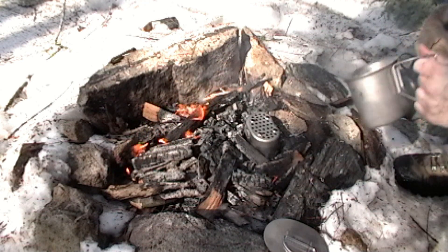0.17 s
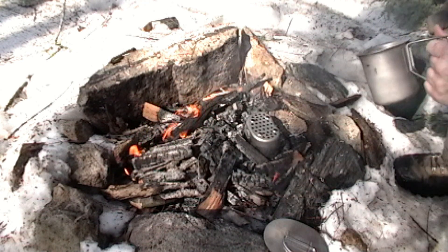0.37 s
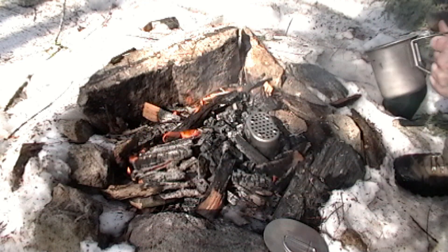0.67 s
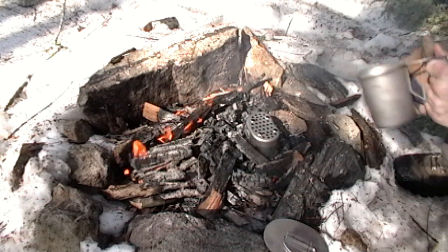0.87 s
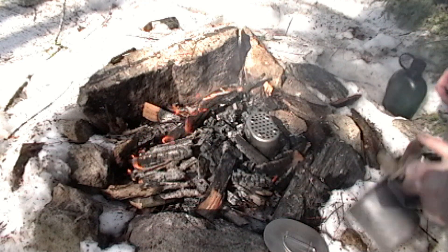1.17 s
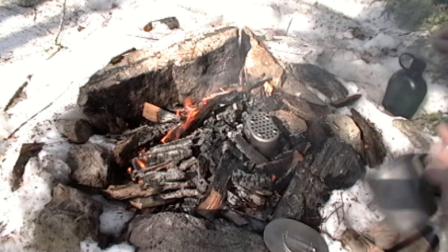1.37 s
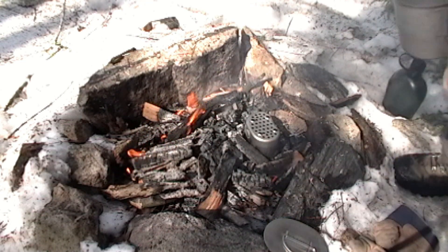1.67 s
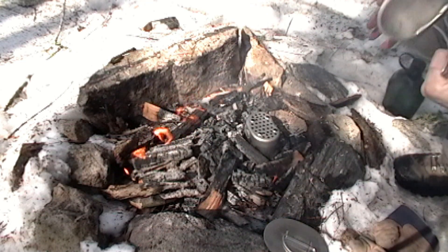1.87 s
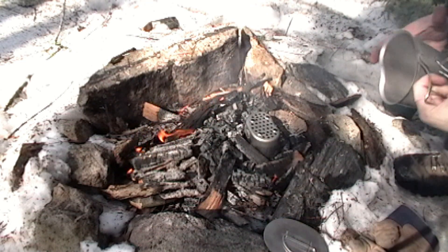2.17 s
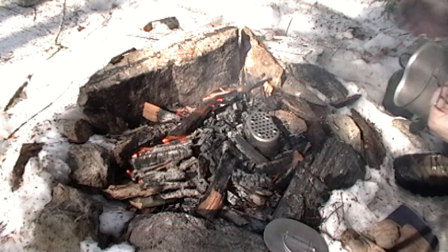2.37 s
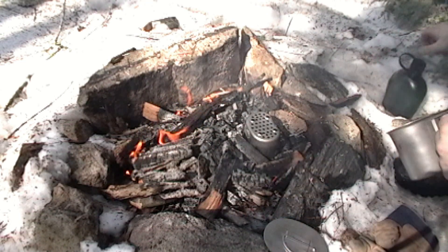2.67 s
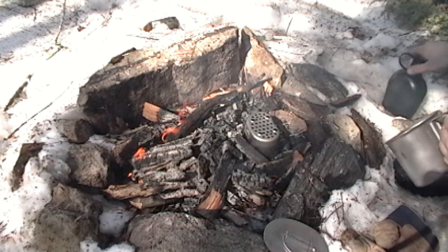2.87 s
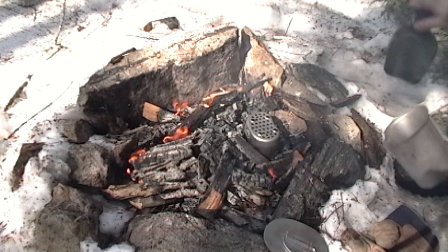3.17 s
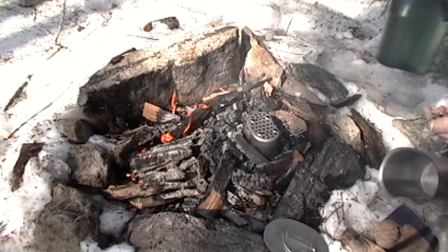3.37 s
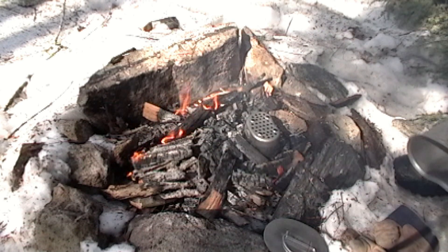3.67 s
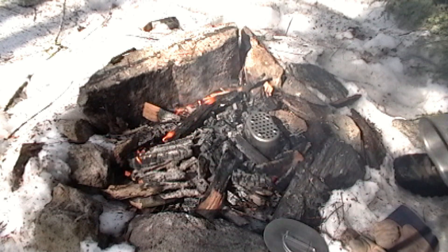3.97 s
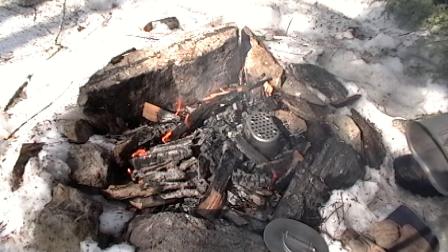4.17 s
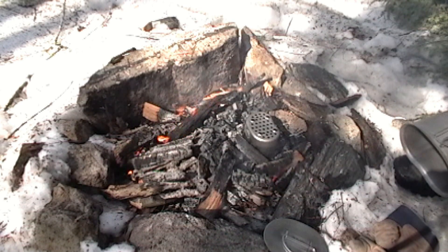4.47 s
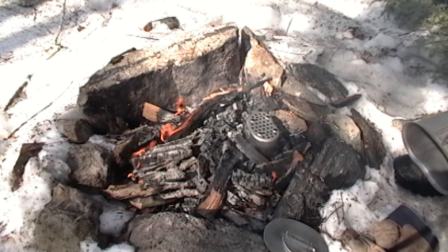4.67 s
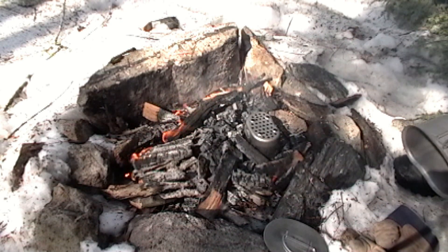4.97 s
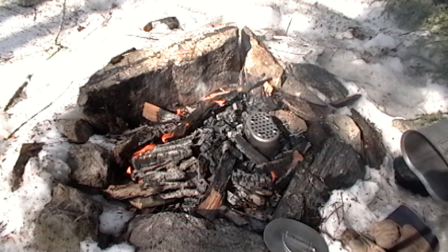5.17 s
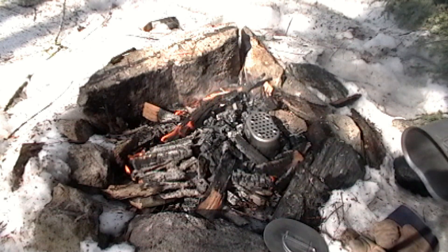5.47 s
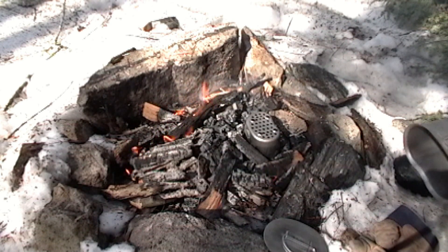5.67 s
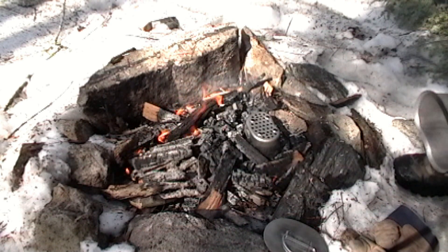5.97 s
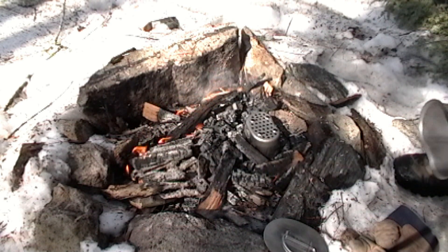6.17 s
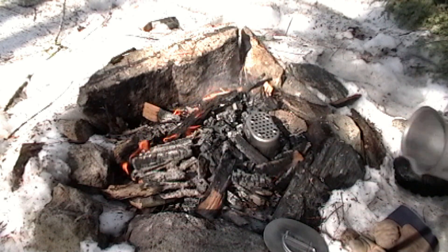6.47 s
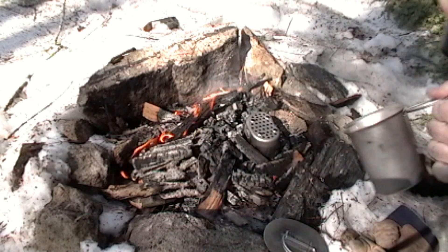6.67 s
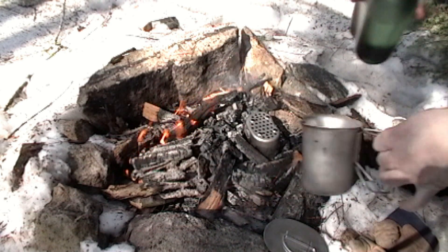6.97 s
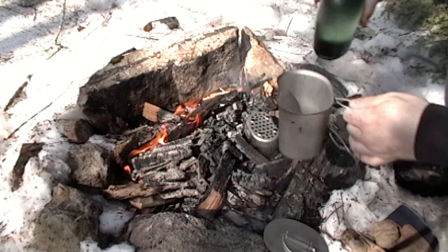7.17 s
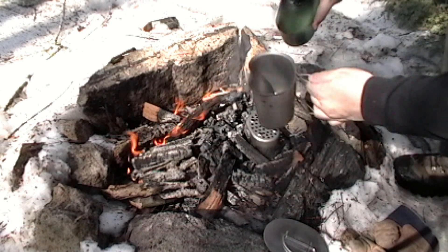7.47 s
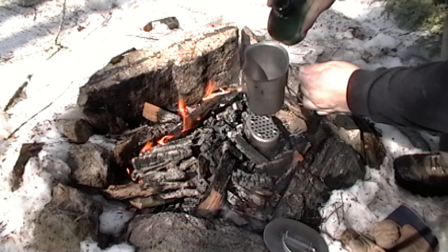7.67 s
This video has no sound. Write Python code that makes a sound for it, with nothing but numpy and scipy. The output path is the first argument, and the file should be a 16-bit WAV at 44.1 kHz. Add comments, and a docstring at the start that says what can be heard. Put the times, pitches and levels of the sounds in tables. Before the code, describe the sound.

Close by and a little to the right, a thin steel mug and cup rattle and knock together with short rings, one sharp clank standing out. After they settle, a plastic bottle cap turns in dry snaps, the neck pops, and water gives a few faint glugs. Sleeves rustle lightly. A small campfire murmurs and crackles softly throughout, outdoors with only a slight echo.

```python
"""Steel clanks close by, right of the microphone: a mug and a canteen cup are pulled apart, knocked
together and set down, their thin walls rattling and ringing. Then the plastic cap of a water bottle
sticks and slips on its thread, the neck pops, and pockets of air ring as the water gives a first glug.
Sleeves rustle. Nearer the middle, a small campfire in the snow murmurs throughout and crackles as
pockets in the wood burst. The woods return a faint tail of the gear."""
import sys
import numpy as np
from scipy import signal
from scipy.fft import rfft, irfft
from scipy.io import wavfile
from scipy.ndimage import uniform_filter1d

SR = 44100
rng = np.random.default_rng(int(sys.argv[2]) if len(sys.argv) > 2 else 0)


def transcribe(signal):
    """Save signal, clipped to [-1, 1], as a 16-bit WAV file at the path in sys.argv[1]."""
    frames = np.atleast_2d(signal).T
    limited = np.clip(frames, -1, 1)
    pcm = np.round(limited * 32767).astype(np.int16)
    wavfile.write(sys.argv[1], SR, pcm)


N = 345539

# The bed of fire and open air. Each row: frequency in Hz, relative level in dB per Hz.
AIR_COLOUR = [(15, -26), (25, -27), (82, 1.5), (149, 2), (416, -5.5), (489, -16), (591, -5.5), (911, -6),
              (1160, -12), (1520, -8.5), (2610, -17.5), (7920, -27), (9570, -23), (14800, -29.5),
              (16000, -46)]
# Sharp cracks of the firewood. Each row: start in seconds, relative level in dB, pitch in Hz.
WOOD_CRACKS = [(.7235, -35.5, 4200), (.7986, -35.5, 11100), (.816, -39, 2440), (1.1243, -43, 6800),
               (1.734, -35, 5200), (2.8557, -38, 11450), (3.5583, -29, 10200), (3.566, -29.5, 11500),
               (3.704, -28.5, 9400), (3.8608, -40.5, 2410), (4.221, -28.5, 11000), (4.7317, -42, 9540),
               (4.9663, -30.5, 10500), (5.3603, -36.5, 11340), (5.5352, -30.5, 7000), (5.7154, -35.5, 6500),
               (5.7827, -39.5, 3870), (6.2248, -33.5, 3760), (6.3096, -39.5, 3870), (6.3344, -33.5, 3800),
               (6.3814, -42, 3610), (6.4838, -40, 8910), (6.5861, -30, 3870), (6.6728, -41.5, 2750),
               (6.9155, -46, 5070), (7.2992, -41.5, 5960), (7.364, -34, 12900), (7.8073, -40, 4350)]
# Cloth and fingers on the gear. Each row: middle in seconds, half length in seconds, relative level in dB.
CLOTH_STROKES = [(.4, 0.2, -53), (.98, 0.24, -50.5), (2.72, 0.026, -59), (3.2, .13, -61.5),
                 (4.12, 0.13, -61.5), (6.3, 1.3, -62.5), (6.8, .07, -55), (7.02, .12, -57),
                 (7.32, 0.029, -53.5)]
# The tone of that rustle. Each row: frequency in Hz, relative level in dB per Hz.
CLOTH_COLOUR = [(1000, -17.5), (2500, -4), (3000, -11.5), (3300, -3), (3800, -2), (5000, -10), (6100, -3),
                (8000, -10), (12000, -11), (16000, -16.5)]
# Dull knocks of the gear, and a low thump as the hardest clank overloads the recorder.
# Each row: start in seconds, level in dB, pitch in Hz.
DULL_THUMPS = [(0.367, -45, 220), (1.31, -40, 232.4), (1.309, -54, 75), (1.314, -17.5, 1070),
               (1.944, -35, 345), (2.103, -40.5, 308), (2.152, -43, 312), (2.57, -41, 200),
               (2.717, -42, 200), (3.289, -43, 110), (3.798, -41.5, 240), (4.13, -44.5, 53.7),
               (6.168, -40.5, 231)]
# Air pockets in the slopping water. Each row: start in seconds, level in dB, starting pitch in Hz.
WATER_BUBBLES = [(3.827, -38, 1850), (3.828, -39, 757), (5.577, -34.5, 1700), (5.672, -26, 740),
                 (6.260, -34.5, 843), (6.553, -35, 820), (7.673, -36, 844), (7.688, -35.5, 294),
                 (7.725, -37.5, 362)]
# The neck popping open. Each row: starting pitch in Hz, level in dB.
POP_TONES = [(573, -16.5), (1570, -16)]
# The cap grinding round. Each row: middle in seconds, half length in seconds, level in dB.
CAP_TURNS = [(4.555, 0.034, -35.5), (4.905, 0.039, -44.5), (5.19, 0.054, -45.5)]
# The cap snapping on its thread. Each row: start in seconds, level in dB, treble in dB,
# grinding time in seconds.
CAP_SNAPS = [(4.118, -34, -11, 0.0013), (4.242, -34, -5, .002), (4.447, -21.5, 0, 0.0017),
             (4.467, -27, -10, .003), (4.538, -29, 4, 0.0035), (4.55, -27, 10, 0.0082),
             (4.592, -37.5, -7, 0.0071), (4.825, -38, -25, .006), (4.842, -33, -14, .003),
             (5.132, -39, -2, 0.0074), (5.137, -27.5, -7, 0.0052), (5.223, -22, 0, .006),
             (5.257, -39.5, -15, 0.011), (5.656, -25.5, 10, 0.0028), (5.667, -26.5, -26, 0.00073)]
# The tone of the cap. Each row: frequency in Hz, relative level in dB per Hz.
PLASTIC_COLOUR = [(88, -26), (150, -5), (240, 0.5), (280, -1.5), (391, -4), (484, -11.5), (524, -5),
                  (730, 2.5), (941, 0), (1080, -6), (1760, 2.5), (3100, -1.5), (4410, -1.5), (11300, -12.5),
                  (16000, -20)]
# The crowd of short modes in the steel walls. Each row: frequency in Hz, relative level in dB per Hz.
WALL_COLOUR = [(500, -31.5), (700, -5), (1050, -18.5), (1250, -10), (1500, -11.5), (2300, -10), (2900, -5),
               (4400, -0.5), (6500, -2.5), (9000, -5), (13000, -9), (16000, -19.5)]
# Clear modes of mug and cup. Each row: frequency in Hz, relative level in dB, nominal t60 in seconds.
MUG_MODES = [(1502, -25, .5), (1975, -7.5, .36), (2360, -14, .3), (2963, 2.5, .2), (3036, -6, .26),
             (3372, -7, .17), (3790, -4, .13), (3950, -4, .19), (4364, -1, .2), (4716, -4, .2),
             (4845, -5, .17), (5367, -1, .17), (5899, -1, .17), (7115, -6, .13), (8680, -11, .11)]
CUP_MODES = [(725, -2, .08), (757, 1.5, .1), (924, -5, .36), (1275, -2, .09), (1720, -4, .11),
             (2180, -1, .2), (2690, 1, .07), (2762, 3, .12), (3854, -1, .14), (4290, 0, .13),
             (4791, 0, .18), (5205, -5, .13), (5716, -3, .1), (6031, 0, .14), (7092, 0, .12),
             (7305, -5, .1), (8312, -5, .12)]
# The mug's lasting tones. Each row: frequency in Hz, relative level in dB, t60 in seconds.
FREE_MUG_MODES = [(1502, -2.5, 1.2), (1975, 7, .3), (2358, 2, .45), (3372, 4, .28), (4712, -3, .42)]
# Steel on steel. Each row: start in seconds, relative level in dB, bass in dB, chatter time in seconds,
# balance of mug over cup in dB, pitch favoured by the point struck in Hz.
STEEL_CLANKS = [(.001, -18.5, 0, 0.016, -1.5, 4300), (.018, -23.5, 3, 0.02, 12, 3000),
                (.076, -18.5, 0.5, 0.0099, 7, 4300), (.089, -21, 1, 0.016, 18, 2960),
                (.130, -27, 2, .007, 13, 2960), (.168, -37.5, 0, 0.027, -6, 2960),
                (.288, -28.5, 5.5, 0.021, 1, 4300), (.362, -33, 2, 0.0063, 6.5, 4300),
                (.906, -29.5, -1.5, 0.0054, -3, 3100), (.934, -26.5, 2, 0.0048, 5, 3200),
                (1.017, -20.5, 0.5, 0.013, 12, 4500), (1.039, -24.5, 7.5, 0.015, -4.5, 4300),
                (1.142, -30.5, 12.5, 0.02, 5, 1270), (1.183, -28.5, 14, 0.02, 14.5, 3900),
                (1.262, -18, -3.5, .027, -7.5, 750), (1.298, -22.5, 2, 0.0063, -13.5, 7040),
                (1.311, -3.5, -11, 0.0029, -10.5, 924), (1.324, -19.5, 4, .05, 6.5, 2000),
                (1.377, -8.5, -10.5, 0.0068, -4, 4660), (1.401, -14, -9.5, .016, -0.5, 3400),
                (1.757, -21.5, 4, 0.028, -2.5, 757), (1.849, -16, 3, 0.025, -22, 2750),
                (1.887, -21, 1, 0.024, -9, 4300), (1.922, -14, -7.5, 0.011, 6, 6000),
                (1.939, -12, 2.5, 0.018, -14.5, 3800), (2.066, -16.5, -10, 0.017, -2, 7300),
                (2.103, -13.5, 5.5, 0.0069, -7, 4790), (2.150, -19, 6, 0.018, 4.5, 8300),
                (2.186, -25.5, 2.5, 0.0063, -2, 4790), (2.241, -41, 13.5, 0.035, 15, 900),
                (2.31, -23, 6, 0.00304, -4.5, 3000), (2.39, -27.5, 10.5, 0.0041, 3, 6000),
                (2.476, -36, 15.5, 0.0043, -2.5, 3800), (2.715, -53.5, 10.5, 0.036, -13, 924),
                (2.775, -30.5, 4, 0.00084, -2, 11000), (2.974, -50, 2.5, 0.0074, -6.5, 4790),
                (3.227, -39.5, -16.5, 0.0023, 0, 9000), (3.703, -41.5, 13.5, 0.0066, -15.5, 800)]
# Stereo width at the microphone. Each row: frequency in Hz, side minus mid in dB.
STEREO_WIDTH = [(30, -5), (120, -24), (600, -15), (2000, -13), (4000, -11.5), (8000, -17.5), (13000, -4.5)]
# The casing shades the left microphone port from sounds on the right.
# Each row: frequency in Hz, left minus right in dB per unit of offset.
CASING_SHADE = [(300, -.7), (1200, -1.2), (2500, -2.9), (4500, -2.4), (8000, 0), (13000, .5)]

SPITS_PER_S, SPIT_DB, SPIT_RANGE_DB = 14, -57, 12   # tiny cracks: most are faint, a few stand out
SPIT_LOW_HZ, SPIT_HIGH_HZ = 2980, 12500
FLURRY_S, FLURRY_HALF_S, FLURRY_PER_S = 7.8, 0.63, 77   # for a while the fire spits more busily
BUBBLE_CYCLES, SWELL_CYCLES, RISE_OCTAVES_PER_S = 52, 1.14, 2.1
CAVITY_HZ, CAVITY_DB, CAVITY_T60_S = 315, -3, 0.034   # the air in the closed bottle
POP_S, POP_T60_S = 5.6565, .049
CHATTER_S = 0.012   # a typical steel contact
TREBLE_DB, TREBLE_DB_PER_DOUBLING = -1, -1.1   # the briefer the contact, the brighter
RING_DB, RING_DB_PER_DOUBLING = -7.5, 4   # the longer it chatters, the more ring builds up
FIRM_DB, GRIP_DAMPING = -23, 0.11   # firm blows press the vessels together: dB of ring lost per dB
MUG_SUSTAIN, CUP_SUSTAIN = 1.05, 1.104   # factors on the nominal t60
LOW_RING_DB = 3   # the rims' slow flexing modes take more of each blow
FAVOUR_DB, WALL_FAVOUR_DB = 8.5, 2.5   # lift for modes near the favoured pitch
GRAZE_DB, GRAZE_LEAD = -17, .5   # the rims graze before they catch; lead as a share of the chatter
FREED_S, FREED_DB, FREED_SWELL_S = 1.379, -35, .016   # the mug comes free


def from_db(db):
    """Decibels to gain."""
    return 10 ** (np.asarray(db) / 20)


def rms_one(x):
    """Scale to rms 1."""
    return x / np.sqrt(np.mean(x ** 2) + 1e-20)


def burst_one(x):
    """Scale so that the loudest 4 ms have rms 1."""
    return x / np.sqrt(uniform_filter1d(x ** 2, size=176).max() + 1e-20)


def at_hz(points, hz):
    """Read a spectrum on a log-frequency axis."""
    f, db = np.transpose(points)
    return np.interp(np.log(np.maximum(hz, 1)), np.log(f), db)


def coloured(x, points, size=4096):
    """Causal, minimum-phase filter through the given (Hz, dB) points."""
    gain = from_db(at_hz(points, np.arange(size // 2 + 1) * SR / size))
    cepstrum = irfft(np.log(gain))
    cepstrum[1:size // 2] *= 2
    cepstrum[size // 2 + 1:] = 0
    return signal.fftconvolve(x, irfft(np.exp(rfft(cepstrum))))[:len(x)]


def add(out, s, sound):
    """Mix a sound in at s seconds."""
    at = int(np.clip(round(s * SR), 0, N - 1))
    out[at:at + len(sound)] += sound[:N - at]


def fade(t, t60):
    """Fall by 60 dB in t60."""
    return np.exp(-np.log(1000) * t / t60)


def swell_and_ebb(middle, half):
    """A smooth rise to 1 and fall again around a moment."""
    return np.exp(-np.minimum(((np.arange(N) / SR - middle) / half) ** 2, 50))


def resonance(x, hz, q):
    """One resonance, narrower as q rises."""
    radius = np.exp(-np.pi * hz / q / SR)
    angle = 2 * np.pi * min(hz, SR / 2) / SR
    return signal.lfilter([1, 0, -1], [1, -2 * radius * np.cos(angle), radius * radius], x)


def woods(x, wet_db=-29, t60=.8):
    """From further off, trunks and rocks scatter a faint, dull tail back to the microphone."""
    t = np.arange(SR) / SR
    colour = [(300, 2.5), (1000, -5), (4500, -1), (9000, -6), (16000, -31.5)]
    tails = [coloured(rng.standard_normal(SR) * fade(t, t60), colour) for side in range(2)]
    echoes = [signal.fftconvolve(x, tail / np.linalg.norm(tail))[:N] for tail in tails]
    return from_db(wet_db) * np.array(echoes)


def fire_murmur(level_db=-52.5, flutter_db=1.8):
    """The soft murmur of flames in the open air, unsteady in the low end."""
    flutter = rms_one(coloured(rng.standard_normal(N), [(10, 0), (25, -15), (80, -60)]))
    air = rms_one(coloured(rng.standard_normal(N), AIR_COLOUR))
    flames = signal.sosfilt(signal.butter(1, 400, fs=SR, output="sos"), air)
    return from_db(level_db) * (air + flames * (from_db(flutter_db * flutter) - 1))


def fire_crackle():
    """Pockets in the burning wood burst: a few loud cracks among many tiny ones; low ones ring woodily."""
    out, t = np.zeros(N), np.arange(SR // 20) / SR
    per_s = SPITS_PER_S + FLURRY_PER_S * swell_and_ebb(FLURRY_S, FLURRY_HALF_S)
    starts = np.flatnonzero(rng.random(N) < per_s / SR) / SR
    spits = [(s, SPIT_DB + SPIT_RANGE_DB * size ** 3, SPIT_LOW_HZ + (SPIT_HIGH_HZ - SPIT_LOW_HZ) * pitch)
             for s, (size, pitch) in zip(starts, rng.random((len(starts), 2)))]
    for s, db, hz in list(WOOD_CRACKS) + spits:
        burst = rng.standard_normal(len(t)) * (fade(t, .005) + .09 * fade(t, .045))
        wood = burst_one(resonance(burst, hz, q=18000 / hz))
        tick = burst_one(resonance(burst, 9000, q=.8))
        add(out, s, from_db(db - 1.5) * burst_one(wood + 0.42 * tick))
    return out


def friction(strokes, colour, grain_db):
    """Sliding surfaces catch and let go in grains of about a millisecond; each stroke swells and ebbs."""
    grains = np.repeat(rng.standard_normal(N // 40 + 1), 40)[:N]
    power = sum((from_db(db) * swell_and_ebb(middle, half)) ** 2 for middle, half, db in strokes)
    scrape = rng.standard_normal(N) * from_db(grain_db * grains)
    return np.sqrt(power) * rms_one(coloured(scrape, colour))


def handling(ring_db=-1):
    """Cloth and fingers slide over the gear and draw a faint, damped ring from the mug."""
    rub = friction(CLOTH_STROKES, CLOTH_COLOUR, grain_db=3)
    ring = sum(from_db(db) * resonance(rub, hz, q=30) for hz, db, _ in MUG_MODES)
    return (rub + from_db(ring_db) * np.std(rub) * rms_one(ring)) / np.sqrt(2)


def thumps():
    """Brief, dull knocks of the gear, and a low thump as the hardest clank overloads the recorder."""
    out, t = np.zeros(N), np.arange(SR // 5) / SR
    for s, db, hz in DULL_THUMPS:
        push = rng.standard_normal(len(t)) * fade(t, 7 / hz)
        thump = resonance(resonance(push, hz, q=1.5), hz, q=1.2)
        add(out, s, from_db(db) * burst_one(thump))
    return out


def air_pocket(hz, t60):
    """Trapped air swells within a cycle or two and rings, rising in pitch."""
    t = np.arange(SR // 5) / SR
    phase = 2 * np.pi * np.cumsum(hz * 2 ** (RISE_OCTAVES_PER_S * t)) / SR
    return np.sin(phase) * (1 - np.exp(-t * hz / SWELL_CYCLES)) * fade(t, t60)


def bottle():
    """The air in the closed bottle answers each snap of the cap, the neck pops, and bubbles ring."""
    out = np.zeros(N)
    for s, db, _, _ in CAP_SNAPS:
        if s < POP_S - POP_T60_S:
            add(out, s, from_db(db + CAVITY_DB) * air_pocket(CAVITY_HZ, CAVITY_T60_S))
    for hz, db in POP_TONES:
        add(out, POP_S, from_db(db) * air_pocket(hz, POP_T60_S))
    for s, db, hz in WATER_BUBBLES:
        add(out, s, from_db(db) * air_pocket(hz, BUBBLE_CYCLES / hz))
    return out


def chatter(t, length, per_s, bounce):
    """A first touch, then uneven little rebounds that die away."""
    rebounds = rng.random(len(t)) < per_s / SR
    force = rebounds * rng.standard_normal(len(t)) * bounce * np.exp(-(t / length) ** 2)
    force[0] = 1
    return force


def cap():
    """The plastic thread sticks and slips in bunches of dry snaps, and grinds as it turns."""
    out, t = np.zeros(N), np.arange(SR // 8) / SR
    for s, db, treble_db, length in CAP_SNAPS:
        shell = rng.standard_normal(len(t)) * (fade(t, 0.0046) + 0.33 * fade(t, 0.053))
        snaps = signal.fftconvolve(shell, chatter(t, length, per_s=770, bounce=0.71))[:len(t)]
        colour = [(hz, level + treble_db / (1 + (3000 / hz) ** 2)) for hz, level in PLASTIC_COLOUR]
        add(out, s, from_db(db) * burst_one(coloured(snaps, colour)))
    return out + friction(CAP_TURNS, PLASTIC_COLOUR, grain_db=7.5)


def favoured(hz, pitch, octaves):
    """1 for modes at the favoured pitch, falling to 0 on either side."""
    return np.exp(-(np.log2(hz / pitch) / octaves) ** 2)


def vessel_ring(modes, t, swell, sustain, bass_db, pitch, spread_db=2.0):
    """Modes build up during contact; blunt blows favour low ones, high ones vary with the point struck."""
    hz, db, t60 = np.transpose(modes)[:, :, None]
    low = 1 / (1 + (hz / 1300) ** 4)
    scatter_db = spread_db * (1 - low) * rng.standard_normal(hz.shape)
    point_db = FAVOUR_DB * favoured(hz, pitch, octaves=.11) + scatter_db
    strength = from_db(db + (bass_db + LOW_RING_DB) * low + point_db)
    waves = np.sin(2 * np.pi * (hz * t + rng.random(hz.shape))) * fade(t, t60 * sustain)
    nominal_rms = np.sqrt(np.sum(from_db(db) ** 2) / 2)
    return (strength * waves).sum(0) * (1 - np.exp(-2 * t / swell)) / nominal_rms


def free_mug_ring():
    """The mug's longest tones swell as its rim comes free and die away slowly."""
    t = np.arange(SR) / SR
    tones = sum(from_db(db) * np.sin(2 * np.pi * hz * t) * fade(t, t60) for hz, db, t60 in FREE_MUG_MODES)
    return tones * (1 - np.exp(-t / FREED_SWELL_S))


def steel_clanks(count=520):
    """Each clank rattles the crowded modes of the thin walls and leaves mug and cup ringing."""
    out, ring_t = np.zeros(N), np.arange(SR * 2 // 3) / SR
    t = ring_t[:SR // 4]
    hz = 500 + 15700 * ((np.arange(count) + rng.random(count)) / count) ** 1.4
    t60 = 0.11 * (hz / 4000) ** -.15
    walls = np.sin(2 * np.pi * hz[:, None] * t) * fade(t, t60[:, None])
    spacing_hz = np.gradient(uniform_filter1d(hz, size=9))
    wall_db = at_hz(WALL_COLOUR, hz) + 10 * np.log10(spacing_hz)
    bass, treble = 1 / (1 + (hz / 1800) ** 4), 1 / (1 + (7000 / hz) ** 4)
    for s, db, bass_db, length, mug_over_cup_db, pitch in STEEL_CLANKS:
        doublings = np.log2(length / CHATTER_S)
        treble_db = TREBLE_DB + TREBLE_DB_PER_DOUBLING * doublings
        point_db = WALL_FAVOUR_DB * favoured(hz, pitch, octaves=0.49) + 3 * rng.standard_normal(count)
        strength = from_db(wall_db + bass_db * bass + treble_db * treble + point_db)
        body = (strength * rng.choice([-1, 1], count)) @ walls
        body *= 1 + 1.2 * fade(t, 0.041)   # the dent springs back with a crack
        for start, contact_db in ((s - GRAZE_LEAD * length, db + GRAZE_DB), (s, db)):
            clank = signal.fftconvolve(body, chatter(t, length, per_s=2300, bounce=0.51))[:len(t)]
            add(out, start, from_db(contact_db - 3.0) * burst_one(clank))
        ring_db = db + RING_DB + RING_DB_PER_DOUBLING * doublings - GRIP_DAMPING * (db - FIRM_DB)
        lean = np.arctan(from_db(mug_over_cup_db))   # the two vessels share the energy of the ring
        mug = vessel_ring(MUG_MODES, ring_t, length, MUG_SUSTAIN, bass_db, pitch)
        cup = vessel_ring(CUP_MODES, ring_t, length, CUP_SUSTAIN, bass_db, pitch)
        add(out, s, from_db(ring_db) * np.sin(lean) * mug)
        add(out, s, from_db(ring_db + 2.0) * np.cos(lean) * cup)
    add(out, FREED_S, from_db(FREED_DB) * free_mug_ring())
    # the clanks carry hardly any sound below about 600 Hz
    return signal.sosfilt(signal.butter(7, 580, "high", fs=SR, output="sos"), out)


def placed(sources, offset):
    """Sources radiate a different mix to the sides; an offset to the right shades the left port."""
    mid = sum(source() for source in sources)
    side = coloured(sum(source() for source in sources), STEREO_WIDTH)
    left = coloured(mid + side, [(hz, offset * db / 2) for hz, db in CASING_SHADE])
    right = coloured(mid - side, [(hz, -offset * db / 2) for hz, db in CASING_SHADE])
    return np.array([left, right])


def scene():
    """The gear is close by, right of the microphone; fire and rustle sit nearer the middle."""
    foreground = placed([steel_clanks], offset=1.1) + placed([cap, bottle, thumps], offset=1.3)
    camp = placed([fire_crackle, handling, fire_murmur], offset=.6)
    return foreground + camp + woods(foreground.mean(0))


def record(dry):
    """The hardest blow overloads the recorder; the top is cut, 60 dB down at 16.7 kHz."""
    return signal.sosfilt(signal.cheby2(16, 60, 16700, fs=SR, output="sos"), np.clip(dry, -1, 1))


dry = scene()
out = record(dry)
transcribe(out)
```